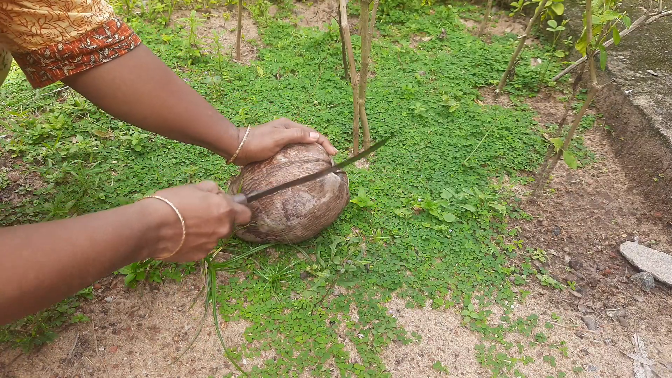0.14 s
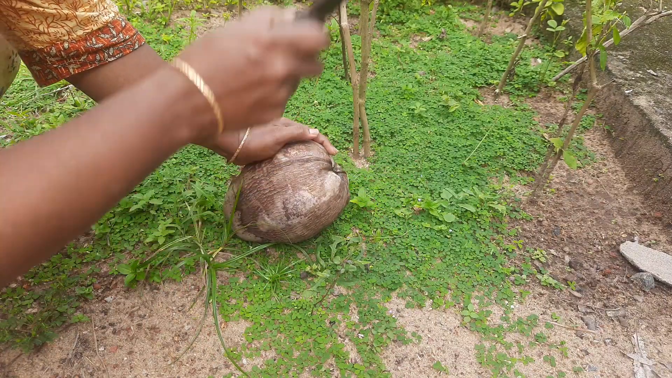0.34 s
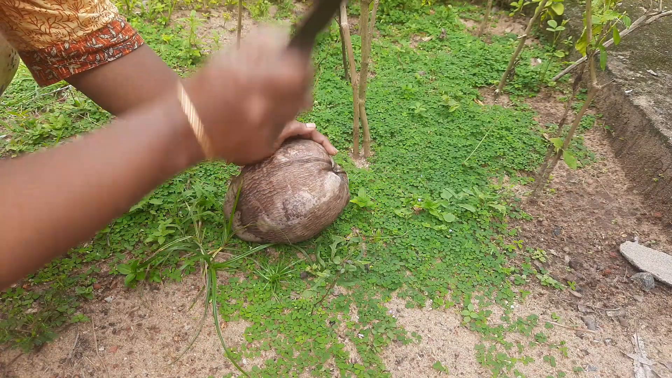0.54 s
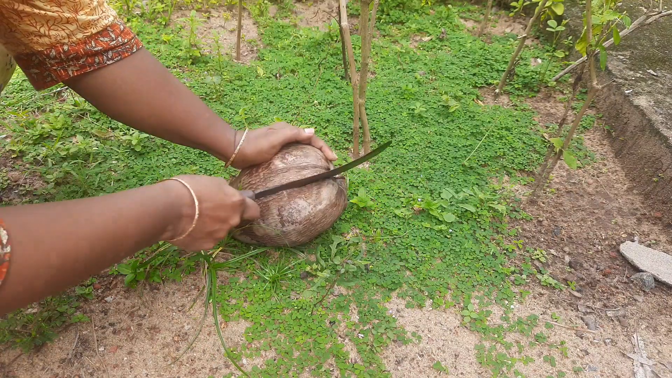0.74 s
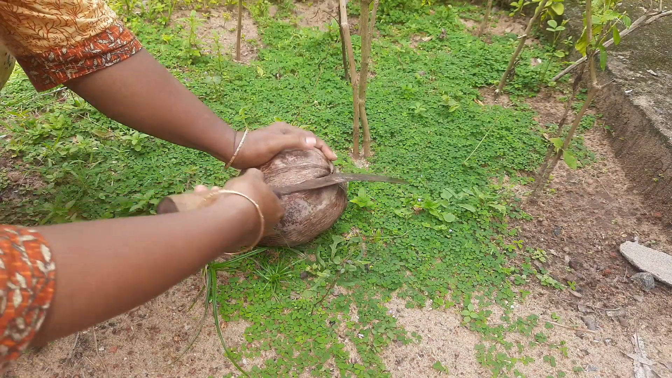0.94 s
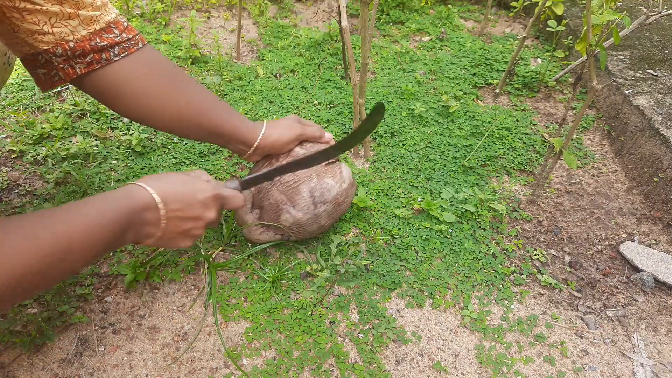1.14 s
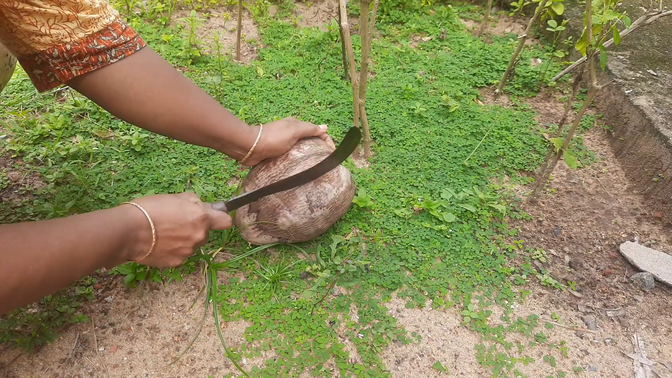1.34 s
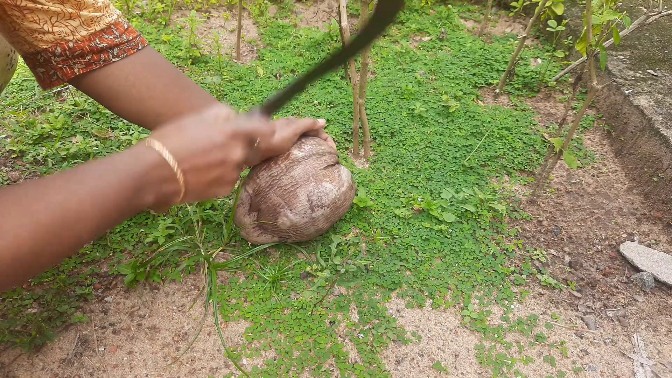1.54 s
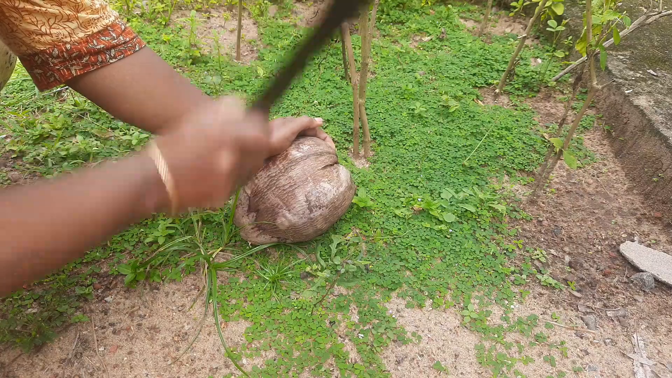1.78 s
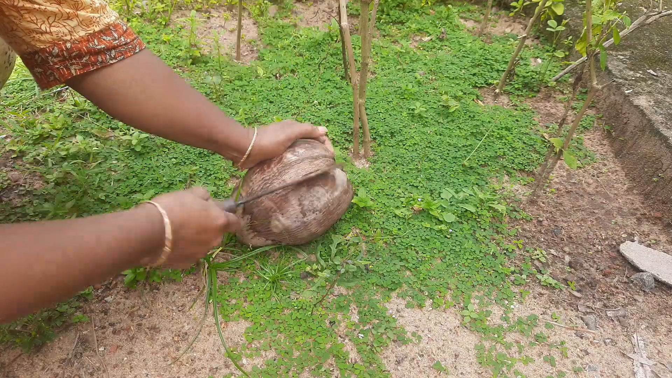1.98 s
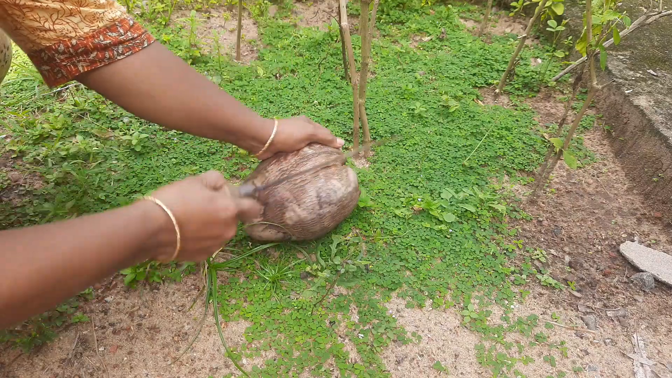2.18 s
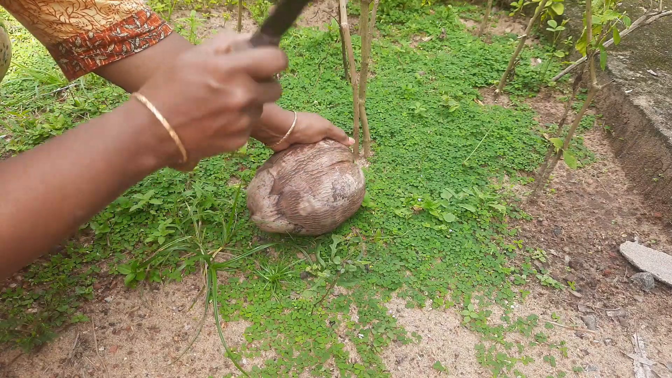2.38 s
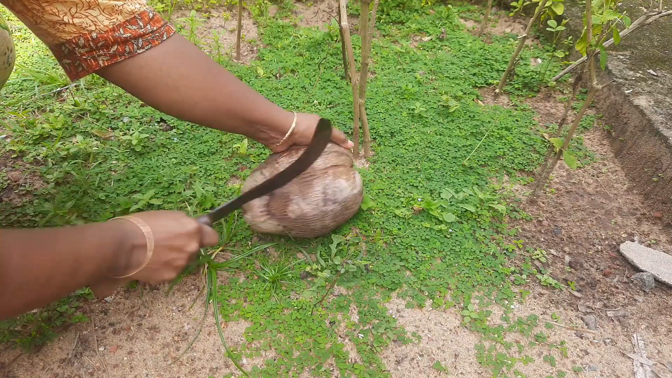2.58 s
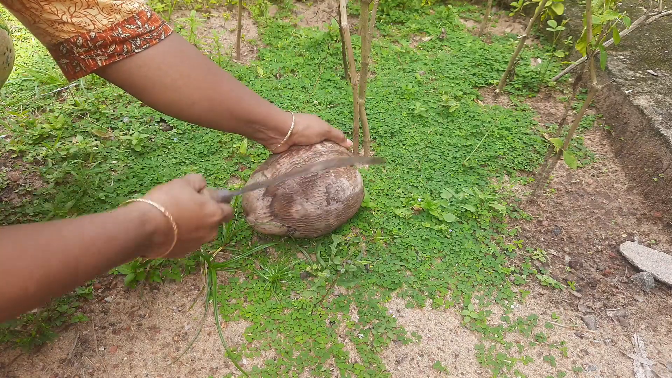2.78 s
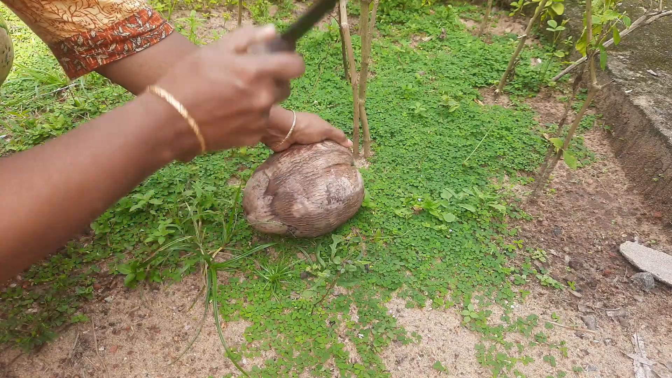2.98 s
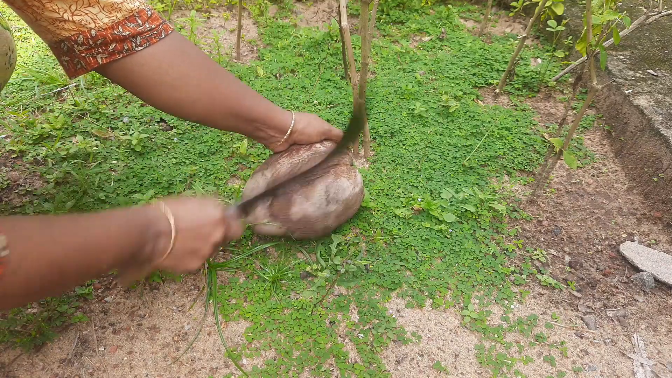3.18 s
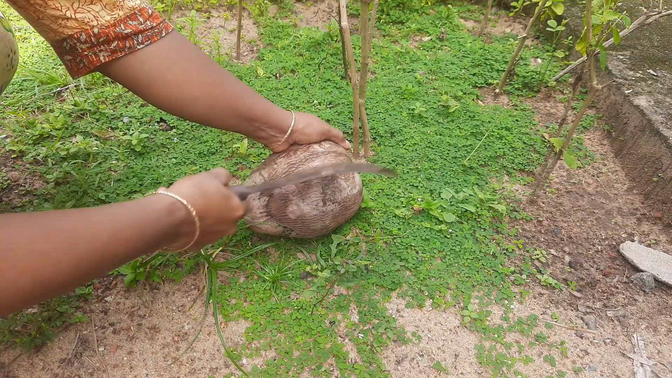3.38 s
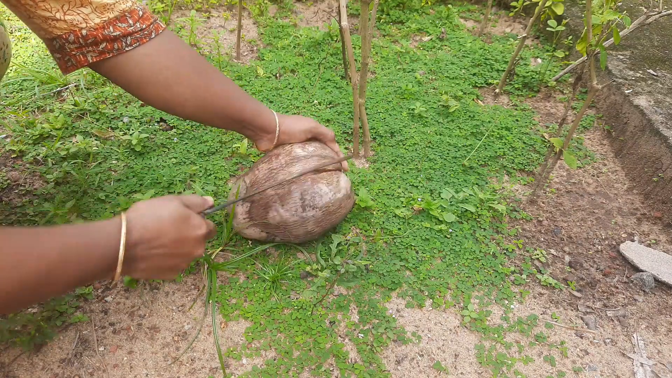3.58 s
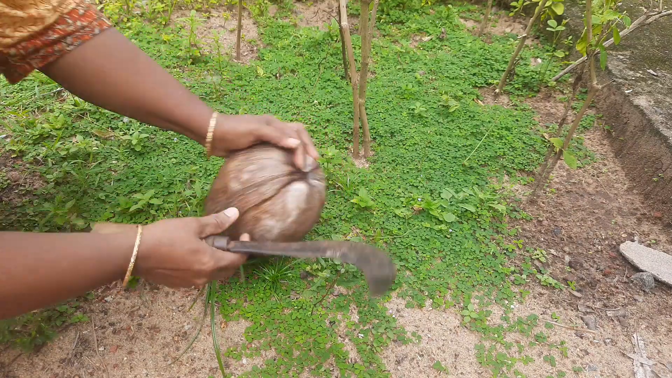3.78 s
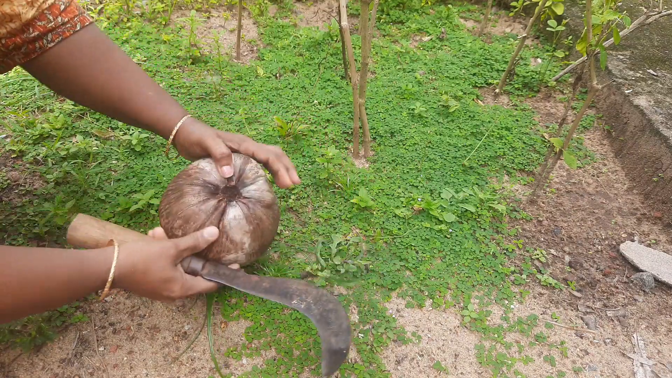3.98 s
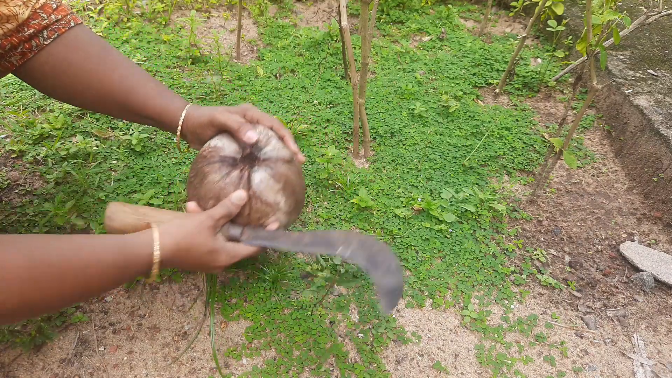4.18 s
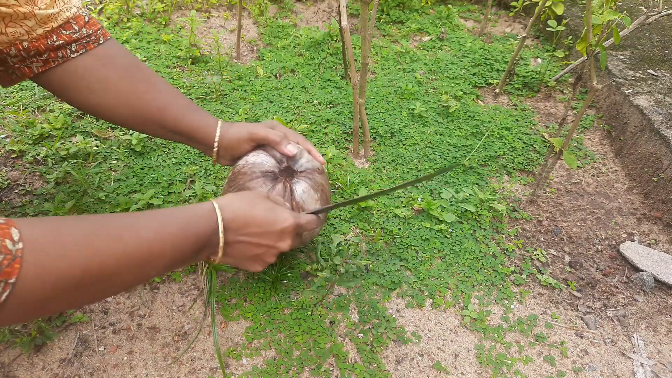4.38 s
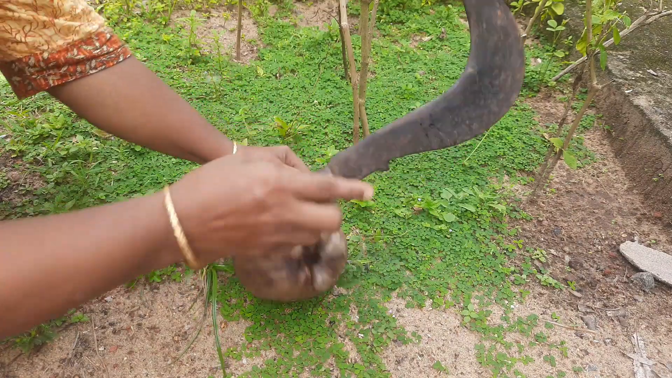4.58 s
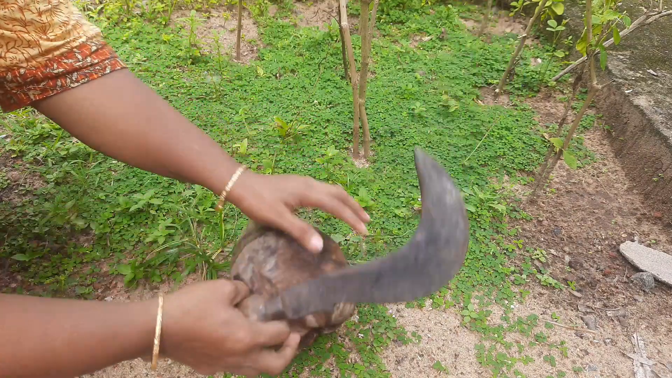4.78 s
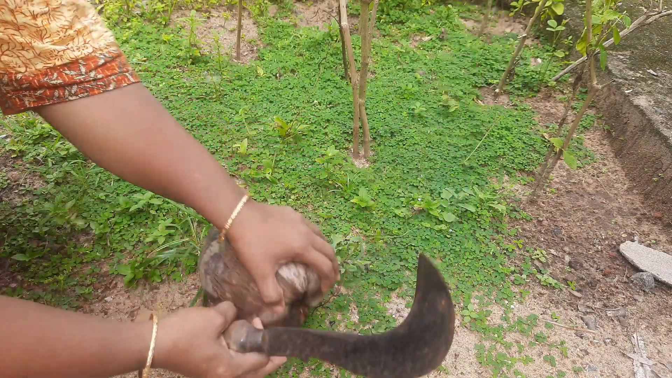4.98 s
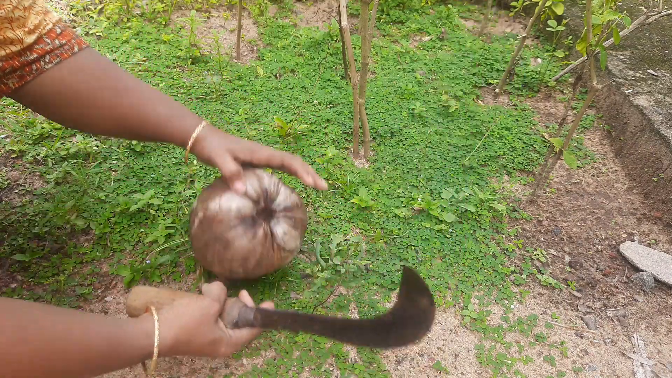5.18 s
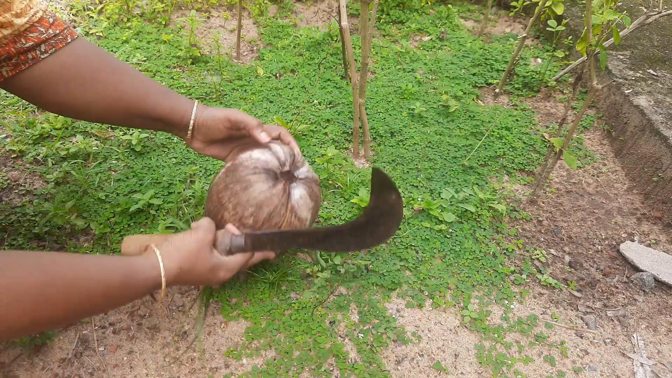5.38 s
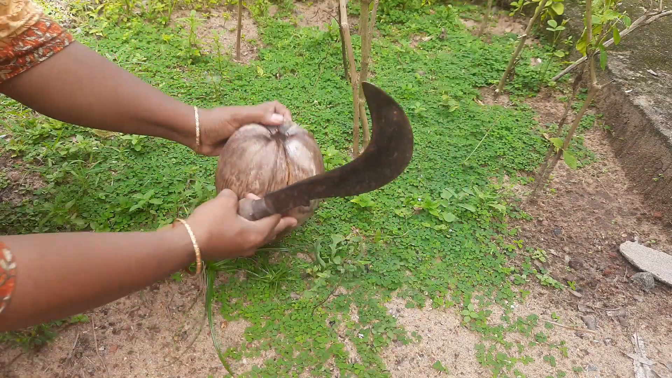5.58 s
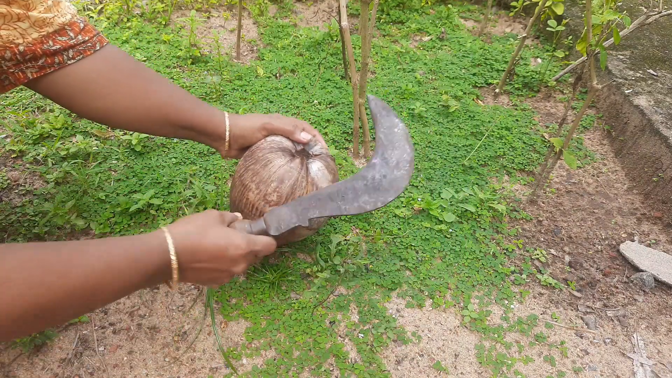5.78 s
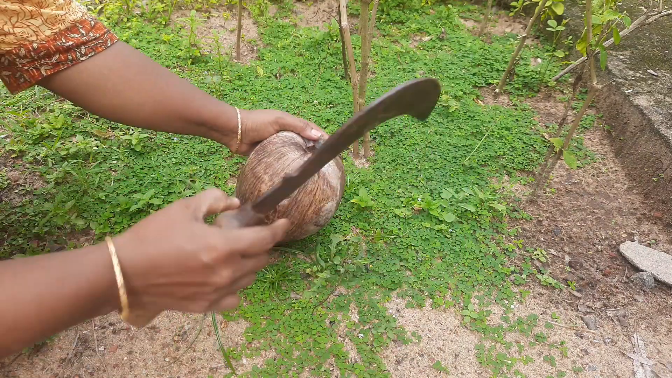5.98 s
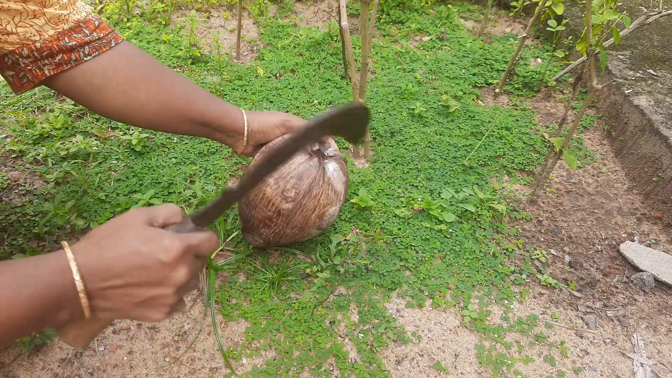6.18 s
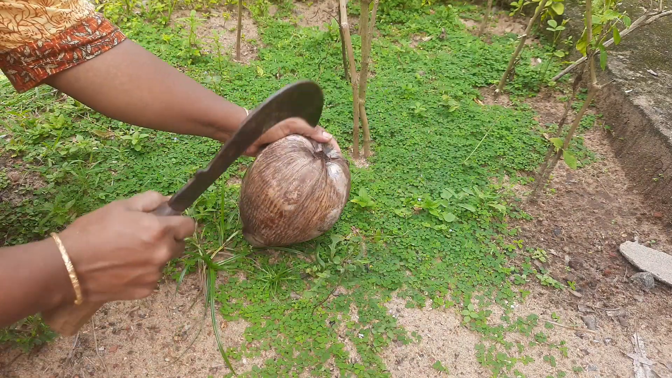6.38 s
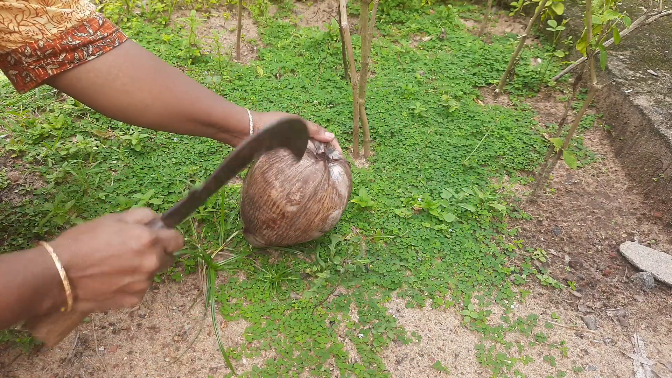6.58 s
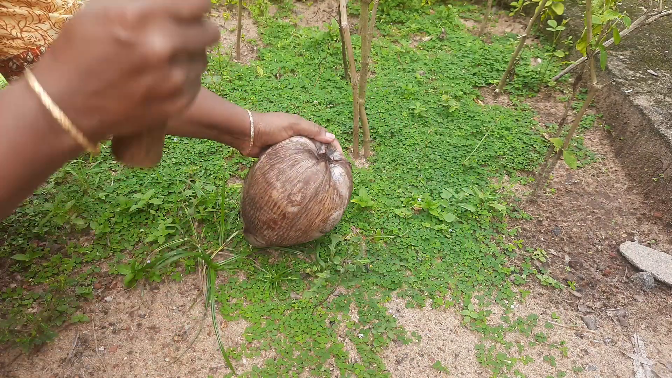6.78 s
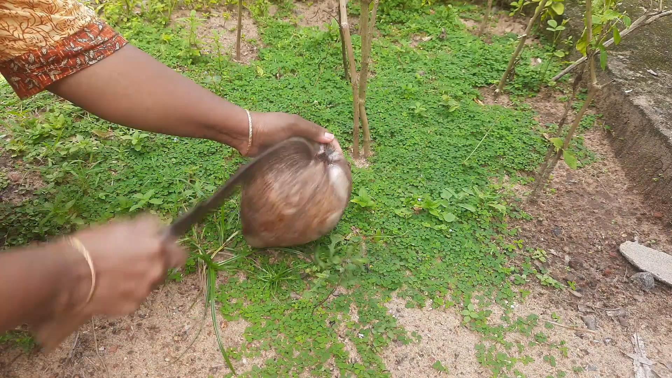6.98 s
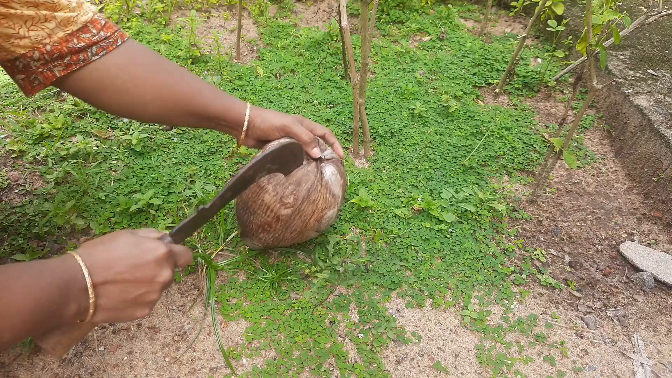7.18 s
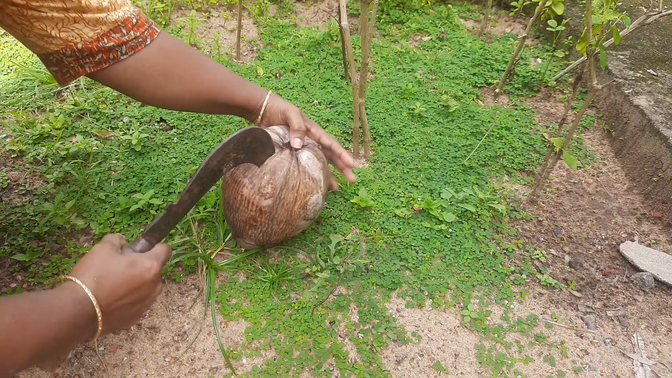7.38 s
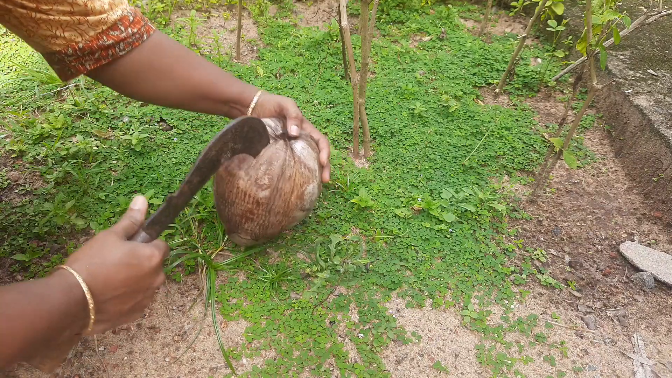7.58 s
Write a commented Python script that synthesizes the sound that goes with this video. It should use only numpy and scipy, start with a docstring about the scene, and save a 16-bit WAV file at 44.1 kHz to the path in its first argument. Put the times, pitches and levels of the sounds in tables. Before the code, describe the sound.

A heavy blade hacks a dry husk in sharp, woody blows, then hands rustle and turn it while crows caw and a bird whistles far off.

```python
"""Chopping a coconut

A heavy curved blade chops into a dry husk on grass, close to a two-port microphone: noise bursts ring husk
and shell, decaying tones make the thuds and chinks, and gritty noise makes the rustle of hands and fibres.
A wall and the yard throw the blows back as smeared copies and a sparse reverberant tail.
Far off a bird whistles in pairs (sine glides) and crows caw (pulsed noise) over a quiet wash of noise."""
import sys
import numpy as np
from scipy import signal
from scipy.fft import rfft, irfft
from scipy.io import wavfile
from scipy.ndimage import uniform_filter1d

SR = 44100
rng = np.random.default_rng(int(sys.argv[2]) if len(sys.argv) > 2 else 0)


def master_out(mix):
    """Clip the mix to full scale and print it as 16-bit PCM to the path in sys.argv[1]."""
    frames = np.transpose(np.atleast_2d(mix))
    ceiling = np.clip(frames, -1, 1)
    pcm = np.round(ceiling * 32767).astype(np.int16)
    wavfile.write(sys.argv[1], SR, pcm)


N = 336924

# Levels in the event tables are set against each other; the sources trim them further.
# Spectrum of leaves and traffic. Each row: frequency in Hz, density in relative dB per Hz.
WASH = [(15, -44.5), (25, -17.5), (90, -9), (187, -17), (410, -4.5), (952, -11), (5130, -29.5),
        (11000, -27.5), (14800, -30.5), (16500, -38)]
WASH_DB = -73.5  # rms
# Likeness of left and right in wash and yard. Each row: frequency in Hz, correlation (clipped to 1).
SAME = [(60, 1), (130, -1.6), (290, 0.98), (640, 0.2), (1410, -0.39), (3100, 0.11), (6820, 0.34),
        (15000, 1)]
# Far caws. Each row: start in seconds, length in seconds, throat resonance in Hz at the start,
# the same in Hz at the end, throat width in Hz, level in dB.
CAWS = [(0.1, 0.85, 1560, 1450, 506, -73), (1.161, 0.18, 1480, 1440, 307, -61.5),
        (2.845, 0.24, 1900, 1700, 300, -78), (3.643, 0.17, 1930, 2130, 710, -63.5),
        (4.1, 0.35, 1850, 1800, 607, -64.5), (4.472, 0.094, 1744, 1840, 350, -59),
        (5.324, 0.19, 2000, 1770, 305, -62.5), (5.519, 0.2, 1920, 1820, 298, -62.5),
        (6.488, 0.43, 1520, 1700, 300, -70.5), (6.555, 0.27, 1870, 1920, 300, -69),
        (6.766, 0.27, 1960, 1450, 438, -64.5), (7.252, 0.31, 1733, 1400, 300, -82)]
# Whistles in pairs. Each row: start in seconds, length in seconds, level in dB,
# start of the second note in seconds after the first, its length in seconds, its level in dB.
WHISTLES = [(0.337, 0.077, -59.5, 0.18, 0.14, -60), (2.244, 0.075, -61, 0.18, .15, -65),
            (6.418, 0.044, -63, 0.14, 0.11, -67)]
FIRST_HZ, SECOND_HZ = (2160, 2760), (2270, 3020)  # each note glides up from, to
# How long the yard rings, before stretching. Each row: frequency in Hz, 60 dB decay time in seconds.
YARD = [(100, 0.69), (300, 0.74), (700, 0.49), (2000, 0.47), (5000, 0.26), (10000, 0.4), (16000, 0.46)]
# Copies off the walls. Each row: delay in seconds, 60 dB decay time of the smear in seconds, level in dB.
ECHOES = [(0.025, 0.026, -23.5), (0.033, 0.011, -16.5), (0.036, 0.12, -13.5), (.143, .006, -55)]
# What the walls favour. Each row: resonance in Hz, width in Hz, relative level in dB.
WALL = [(200, 200, -10), (610, 530, 5.5), (2000, 1500, -7), (5000, 2800, -20)]
# Hands working over husk and grass, as an envelope. Each row: time in seconds, fine rustle level in dB.
HANDS = [(0, -83.5), (1.7, -92), (2.3, -75.5), (2.551, -94.5), (3.548, -86), (3.701, -70.5), (3.8, -63),
         (3.85, -66.5), (4.0, -67.5), (4.171, -67), (4.26, -72.5), (4.32, -65), (4.44, -67), (4.54, -56.5),
         (4.59, -62.5), (4.68, -65), (4.751, -76.5), (4.92, -73), (4.97, -65), (5.05, -67.5), (5.15, -61),
         (5.34, -68.5), (5.45, -76.5), (5.65, -72.5), (5.8, -73.5), (6.061, -81.5), (6.3, -86.5),
         (6.602, -82), (7.0, -82), (7.19, -63), (7.36, -75), (7.64, -77)]
# The stuck blade is wrenched in its cut. Each row: start in seconds, length in seconds,
# fine rustle in dB, coarse scrape in dB, low shuffle in dB.
WRENCHES = [(0.728, 0.25, -69, -84, -64), (0.971, 0.29, -69.5, -62.5, -71), (1.895, 0.22, -61.5, -59, -51)]
# Colours of the three grain sizes of rustle. Each row: frequency in Hz, density in relative dB per Hz.
FINE = [(2650, -34), (4500, 1), (8010, 3), (9900, -3), (12200, 0.5), (15000, -3), (16200, -1), (16500, -50)]
COARSE = [(250, -37), (500, -10), (1000, 1.5), (2000, 4), (3500, -3), (5500, 1), (8000, -23)]
SHUFFLE = [(20, -43), (40, -2.5), (70, 5.5), (120, -1), (250, -11), (450, -16.5), (700, -50)]
HANDS_COARSE_DB, CRUSH_COARSE_DB = -2.5, 10  # coarse scrape against fine rustle
STILL_COARSE_DB, STILL_SHUFFLE_DB = -86.5, -70  # steady floors of scrape and shuffle
TICKS_PER_S, TICKS_DB = 70, -11  # single ticks in the rustle; level against fine rustle
AFTER_S = 0.052  # crushed husk and rocking nut swell to their top this long after a hit
# Blade on husk. Each row: start in seconds, crack in dB, knock in dB, sizzle in dB, deep thud in dB,
# hollow thud in dB, hollow pitch as a factor, crushed husk in dB, rocking in dB.
BLOWS = [(0.082, -44, -36.5, -57, -46.5, -44.5, 1.19, -90, -63.5),
         (0.6448, -14.5, -21.5, -22.5, -29, -27, 1.15, -65, -50),
         (1.348, -40.5, -34, -52.5, -44, -36, 1.02, -86.5, -61.5),
         (1.8512, -16, -24, -22, -30.5, -20, 0.84, -74.5, -51),
         (2.5929, -13, -20, -26, -33, -23, 1.16, -59.5, -43),
         (3.2194, -12.5, -18.5, -29.5, -28.5, -18, 1.15, -73.5, -48),
         (6.5348, -31, -30.5, -39.5, -57, -36, 1.12, -87, -69.5),
         (7.0256, -21.5, -27, -20, -43, -26.5, 0.92, -86, -56)]
BLOW_T60_S, CRACK_T60_S = 0.026, 0.021  # 60 dB decay of the noise burst
THUD_LATE_S = 0.0042  # the nut meets the soil just after the edge bites
# The nut set down, rolled or driven onto the ground. Each row: start in seconds, hollow thud in dB,
# deep thud in dB, hollow pitch as a factor, rocking in dB.
BUMPS = [(3.512, -43.5, -52, 0.87, -51), (4.337, -41, -41, 0.91, -58.5), (5.658, -42.5, -51.5, 1.01, -69),
         (7.0335, -18, -47, 0.834, -70)]
# Short cracks: snapping fibres, the crack of a bump, and the last blow's second bite.
# Each row: start in seconds, crack in dB, knock in dB, sizzle in dB.
CRACKS = [(0.7253, -59, -60, -42), (0.8046, -47, -55, -48.5), (0.839, -27, -36.5, -26.5),
          (0.8715, -34.5, -78, -37.5), (0.9, -39, -48.5, -35), (0.973, -64, -70, -64),
          (1.0952, -41, -52.5, -50.5), (1.8632, -35, -36.5, -33), (2.0124, -61, -75, -50),
          (2.0273, -45.5, -52, -50), (2.0587, -41, -50.5, -41), (2.0668, -46, -61, -58),
          (3.5928, -29, -42.5, -37), (3.924, -48.5, -56, -45), (3.9387, -51.5, -58, -56),
          (4.043, -61, -70, -56), (4.0776, -56, -72.5, -53), (4.237, -65, -82, -64),
          (4.334, -42, -54, -47.5), (4.418, -55, -66, -62), (4.6383, -60, -70, -57),
          (4.6929, -51, -76, -70), (4.9524, -53.5, -69, -50.5), (5.3609, -57.5, -66, -58),
          (5.659, -49.5, -66, -46.5), (7.0328, -23.5, -25, -34)]
# The blade chinks as it comes free. Each row: start in seconds, level in dB, pitch as a factor,
# ring time as a factor (a looser grip rings longer), lift of the fourth mode in dB.
TINKS = [(.133, -57.5, 0.96, 1.8, -6), (2.056, -40, .92, 2.1, 15), (3.548, -28.5, 1.04, 0.67, 10),
         (3.572, -33, 0.93, 0.83, -4), (3.594, -51, 1.005, 1, 0), (3.907, -45, 1.5, 1, -10),
         (6.54, -61.5, 1, 1.7, 20)]
# Short drags of blade or husk, one faint narrow hiss and one faint ring of the blade.
# Each row: start in seconds, length in seconds, centre in Hz, width in Hz, level in dB.
SCUFFS = [(1.047, 0.068, 1120, 1510, -54), (1.067, 0.047, 5860, 9000, -52), (1.987, 0.1, 1650, 2520, -60),
          (3.501, 0.04, 671, 975, -43.5), (3.502, 0.095, 5800, 9260, -52), (3.869, 0.074, 5000, 9100, -54),
          (4.352, 0.047, 910, 400, -51.5), (4.372, 0.057, 5000, 8000, -52.5), (4.758, 0.26, 6720, 700, -79),
          (4.944, 0.073, 2000, 1810, -59), (4.608, 0.029, 9000, 14200, -50),
          (4.611, 0.023, 2570, 2960, -52.5), (5.212, .02, 11000, 10100, -55),
          (5.214, 0.014, 6080, 900, -47), (5.646, 0.11, 4760, 247.5, -71), (5.364, 0.033, 756, 503, -65.5),
          (5.463, 0.09, 1100, 610, -66.5)]
# Broad resonances of husk, of splitting fibre ends, and of the shell under the husk.
# Each row: resonance in Hz, width in Hz, relative level in dB.
HUSK = [(1640, 1100, -8), (2600, 1200, -4.5), (3090, 2500, -9), (6020, 1700, -8.5)]
SIZZLE = [(8000, 2100, 1.5), (11000, 3700, -1), (12440, 3000, 2.5), (16500, 370, -2)]
KNOCK = [(602, 1400, -0.5), (1100, 920, 8)]
# Ringing modes of soil and rocking nut, of the hollow nut, and of the blade, before detuning.
# Each row: frequency in Hz, relative level in dB, 60 dB decay time in seconds.
DEEP = [(60, -11, 0.11), (107, -11, 0.26), (139, -6.5, 0.1)]
HOLLOW = [(215, -2.5, 0.095), (287, -3, 0.062), (349, 3.5, 0.033)]
BLADE = [(3430, 10, 0.036), (3740, 2.5, 0.048), (4580, -5, 0.063), (6100, -6, 0.051), (7440, -12, 0.039),
         (9920, -36, 0.053), (11500, 6, 0.017)]
# How far the right port lags for rustling hands, then for blows. Each row: frequency in Hz, lag in radians.
LAG = [(300, 0), (800, .2), (1400, .6), (2300, 1.2), (3500, 2), (5000, 2.9), (7000, 4.4), (9500, 6.2),
       (16000, 6.3)]
BLOW_LAG = [(300, 0), (800, .2), (1400, .7), (2300, 1.2), (3500, 1.5), (5000, 2.1), (5800, 2.5),
            (6500, 3.9), (7500, 4.4), (9500, 4.9), (16000, 5.1)]
# Balance of the ports. Each row: frequency in Hz, left minus right in dB.
TILT = [(60, -2), (150, -2), (300, -.3), (1000, -1.5), (2500, -.6), (5000, 1.5), (13000, 2.4)]
EDGE_HZ = 16600  # upper band limit


def gain_of(db):
    """Decibels to gain."""
    return 10 ** (np.asarray(db) / 20)


def evened(x):
    """Scales to rms 1."""
    return x / np.sqrt(np.mean(x ** 2) + 1e-20)


def read(points, hz):
    """Reads a curve on a log-frequency axis."""
    f, value = np.transpose(points)
    return np.interp(np.log(hz + 1), np.log(f + 1), value)


def add(mix, s, sound):
    """Mixes a sound in at time s, cut off at the end of the mix."""
    part = mix[..., round(s * SR):][..., :sound.shape[-1]]
    part += sound[..., :part.shape[-1]]


def resonate(x, hz, width):
    """A resonance of about unit gain at its peak, which follows the curve hz."""
    turn = np.exp(2j * np.pi * np.cumsum(hz * np.ones(len(x))) / SR)
    r = np.exp(-np.pi * width / SR)
    lowered = x / turn + 1e-18  # the resonance shifted down to 0 Hz
    return 2 * (turn * signal.lfilter([1 - r], [1, -r], lowered)).real


def body(x, modes):
    """Passes x twice through each broad resonance of a body, with alternating signs."""
    out = 0
    for k, (hz, width, db) in enumerate(modes):
        twice = resonate(resonate(x, hz, width), hz, width)
        out = out + (-1) ** k * gain_of(db) * twice
    return out


def coloured(x, points):
    """Filters x by a spectrum curve, then scales to rms 1."""
    hz = np.fft.rfftfreq(x.shape[-1], 1 / SR)
    return evened(irfft(rfft(x) * gain_of(read(points, hz)), x.shape[-1]))


def grit(count, spread_db):
    """Noise whose samples differ much in size: many tiny breaks."""
    sizes = gain_of(spread_db * np.minimum(rng.exponential(1, count), 6))
    return evened(rng.standard_normal(count) * sizes)


def paired(left, other, hz):
    """Blends two independent spectra so that left and right are as alike as SAME asks."""
    same = np.clip(read(SAME, hz), -1, 1)[:, None]
    return np.array([left, same * left + np.sqrt(1 - same ** 2) * other])


def wash():
    """Distant leaves and traffic: smooth noise with drifting patches in time and frequency."""
    frames, hz = N // 256 + 5, np.fft.rfftfreq(1024, 1 / SR)
    a, b, c, d, patches = rng.standard_normal((frames, 513, 5)).T
    patches = evened(uniform_filter1d(uniform_filter1d(patches, 12, 0), 20, 1))
    z = paired(a + 1j * b, c + 1j * d, hz)
    z *= gain_of(read(WASH, hz)[:, None] + 1.4 * patches)
    noise = signal.istft(z, nperseg=1024, noverlap=768)[1][:, :N]
    return gain_of(WASH_DB) * evened(noise)


def crows():
    """Rough puffs of noise, one a cycle at an unsteady pitch around 240 Hz, through a narrow throat."""
    out = np.zeros(N)
    for s, length, start_hz, end_hz, width, db in CAWS:
        u = np.arange(0, length, 1 / SR) / length
        wobble = uniform_filter1d(rng.standard_normal(len(u)), 400)
        turns = np.cumsum(240 * (1 + 2.4 * wobble)) / SR
        puffs = np.exp(-(turns % 1) / 0.25) * (0.6 + rng.standard_normal(len(u)))
        throat_hz = start_hz + (end_hz - start_hz) * u
        caw = evened(resonate(resonate(puffs, throat_hz, width), throat_hz, width))
        add(out, s, gain_of(db) * caw * signal.windows.tukey(len(u), 0.4))
    return out


def whistle(length, db, low_hz, top_hz):
    """A near-sine glide that levels off at the top."""
    u = np.arange(0, length, 1 / SR) / length
    hz = low_hz + (top_hz - low_hz) * np.sin(np.pi / 2 * u) ** 2.2
    return gain_of(db) * np.sin(np.pi * u ** 1.1) * np.sin(2 * np.pi * np.cumsum(hz) / SR)


def bird():
    """A small bird whistles two rising notes at a time, the second one higher."""
    out = np.zeros(N)
    for s, length, db, gap, length_two, db_two in WHISTLES:
        add(out, s, whistle(length, db, *FIRST_HZ))
        add(out, s + gap, whistle(length_two, db_two, *SECOND_HZ))
    return out


def yard(x, wet_db, start, stretch):
    """Sparse taps of random sign dying band by band, swelling in over about start seconds."""
    taps = rng.choice([-1., 1.], (2, SR)) * (rng.random((2, SR)) < 0.1)
    hz, t, z = signal.stft(taps, SR, nperseg=256)
    z = paired(z[0], z[1], hz)
    decay = gain_of(-60 * t / stretch / read(YARD, hz)[:, None])
    tail = signal.istft(z * decay, SR, nperseg=256)[1][:, :SR]
    tail = tail * (1 - np.exp(-(np.arange(SR) / SR / start) ** 2))
    tail = tail / np.linalg.norm(tail[0])
    return gain_of(wet_db) * signal.fftconvolve(x[None], tail, axes=1)[:, :N]


def walls(x):
    """Rough walls send back smeared, hollow copies: decaying noise after each delay."""
    back, t = np.zeros((2, 9000)), np.arange(3000) / SR
    for delay, t60, db in ECHOES:
        noise = rng.standard_normal((2, 3000)) + rng.standard_normal(3000)  # half shared by both sides
        smear = noise * gain_of(-60 * t / t60)
        add(back, delay, gain_of(db) * smear / np.linalg.norm(smear[0]))
    return signal.fftconvolve(body(x, WALL)[None], back, axes=1)[:, :N]


def swell(rows):
    """Sum of swells that follow hits at (s, top dB): a quick rise, a slower fall."""
    out, u = np.zeros(N), np.arange(SR // 2) / SR / AFTER_S
    for s, db in rows:
        add(out, s, gain_of(db) * u * np.exp(1 - u))
    return out


def rustle():
    """Gritty noise in three sizes for hands, crushed husk, rocking nut and wrenched blade, in short clumps."""
    hands = gain_of(np.interp(np.arange(N) / SR, *np.transpose(HANDS)))
    crush = swell([(s, crush_db) for s, *_, crush_db, _ in BLOWS])
    rock = swell([(s, rock_db) for s, *_, rock_db in BLOWS + BUMPS])
    coarse = gain_of(STILL_COARSE_DB) + hands * gain_of(HANDS_COARSE_DB) + crush * gain_of(CRUSH_COARSE_DB)
    levels = np.array([hands + crush, coarse, gain_of(STILL_SHUFFLE_DB) + rock])
    for s, length, *dbs in WRENCHES:
        hump = np.sin(np.pi * np.arange(0, length, 1 / SR) / length) ** 2
        add(levels, s, gain_of(dbs)[:, None] * hump)

    quick = evened(uniform_filter1d(rng.standard_normal(N), 250))
    slow = evened(uniform_filter1d(rng.standard_normal(N), 1500))
    clumps = evened(quick + slow)

    ticks = rng.standard_normal(N) * (rng.random(N) < TICKS_PER_S / SR)
    out = gain_of(TICKS_DB) * levels[0] * evened(body(ticks, HUSK + SIZZLE)) * np.ones((2, 1))
    for level, colour, clump_db in zip(levels, (FINE, COARSE, SHUFFLE), (2.4, 2.6, 2.1)):
        centre, apart = grit(N, spread_db=2.5), rng.standard_normal((2, N))
        out += level * gain_of(clump_db * clumps) * coloured(centre + 0.74 * apart, colour)
    return out


def scuff(length, hz, width, db):
    """Gritty noise through one resonance, swelling and fading: a drag if wide, a hiss or ring if narrow."""
    u = np.arange(0, length, 1 / SR) / length
    drag = resonate(resonate(grit(len(u), spread_db=-1.0), hz, width), hz, width)
    return gain_of(db) * evened(drag) * np.sin(np.pi * u ** 1.2)


def ring(db, modes, rise, detune, pitch=1):
    """A push rings decaying sine modes, tuned a little differently every time."""
    t = np.arange(12000) / SR
    tune = pitch * (1 + detune * (2 * rng.random(len(modes)) - 1))
    tone = np.zeros(len(t))
    for (hz, mode_db, t60), k in zip(modes, tune):
        tone += gain_of(mode_db - 60 * t / t60) * np.sin(2 * np.pi * hz * k * t)
    tone = tone * (1 - np.exp(-t / rise))
    return gain_of(db) * tone / abs(tone).max()


def chink(db, pitch, loose, lift_db):
    """The freed blade rings its metal modes; a looser grip damps them less."""
    modes = []
    for k, (hz, mode_db, t60) in enumerate(BLADE):
        modes.append((hz, mode_db + lift_db * (k == 3), t60 * loose))
    return ring(db, modes, rise=0.000575, detune=0.0091, pitch=pitch)


def thud(deep_db, hollow_db, pitch):
    """The nut is driven into the soil; how it lies sets the pitch of its hollow."""
    deep = ring(deep_db + 6.5, DEEP, rise=0.0004, detune=0.17)
    hollow = ring(hollow_db + 3, HOLLOW, rise=0.00043, detune=0.051, pitch=pitch)
    return deep - hollow


def settling(sizzle_db):
    """Cut fibres go on crackling for a moment after a blow: sparse ticks that die away."""
    t = np.arange(12000) / SR
    ticks = grit(len(t), spread_db=2.5) * (rng.random(len(t)) < 0.1)
    crackle = evened(body(ticks, HUSK[3:] + SIZZLE))
    return gain_of(sizzle_db - 31.0 - 60 * t / 0.45) * crackle


def crack(crack_db, knock_db, sizzle_db, t60):
    """A sharp blow and a burst of breaking fibres ring shell and husk; row two, for the yard, is one click."""
    t = np.arange(3000) / SR
    burst = grit(len(t), spread_db=1.5) * gain_of(-60 * t / t60) * (1 - np.exp(-(t / 0.00032) ** 2))
    blow = np.exp(-((t - 0.0006) / 0.00003) ** 2)  # the edge bites, then stops dead
    burst = burst - 3.6 * blow
    impulse = 1. * (t == 0)
    out = np.zeros((2, len(t)))
    for db, modes in ((knock_db, KNOCK), (crack_db, HUSK), (sizzle_db, SIZZLE)):
        ringing, click = body(burst, modes), body(impulse, modes)
        click = click * np.linalg.norm(ringing) / np.linalg.norm(click)  # same energy
        out += gain_of(db + 9) * np.array([ringing, click]) / abs(ringing).max()
    return out


def chopping():
    """All blows, bumps, short cracks, chinks and scuffs: toward the microphone, toward the yard."""
    out = np.zeros((2, N))
    for s, crack_db, knock_db, sizzle_db, deep_db, hollow_db, pitch, _, _ in BLOWS:
        add(out, s, crack(crack_db, knock_db, sizzle_db, BLOW_T60_S))
        add(out, s + THUD_LATE_S, thud(deep_db, hollow_db, pitch))
        add(out, s + 0.0043, settling(sizzle_db))
    for s, hollow_db, deep_db, pitch, _ in BUMPS:
        add(out, s, thud(deep_db, hollow_db, pitch))
    for s, crack_db, knock_db, sizzle_db in CRACKS:
        add(out, s, crack(crack_db, knock_db, sizzle_db, CRACK_T60_S))
    for s, *row in TINKS:
        add(out, s, chink(*row))
    for s, *row in SCUFFS:
        add(out, s, scuff(*row))
    return out


def ports(blows, hands):
    """Near sounds reach the left port first; the right lags, and the balance shifts with frequency."""
    hz = np.fft.rfftfreq(N, 1 / SR)
    tilt = gain_of(read(TILT, hz) / 2)
    left = rfft(blows + hands[0]) * tilt
    late_blows = rfft(blows) * np.exp(-1j * read(BLOW_LAG, hz))
    late_hands = rfft(hands[1]) * np.exp(-1j * read(LAG, hz))
    return irfft(np.array([left, (late_blows + late_hands) / tilt]), N)


def scene():
    """Near work with its echoes, far birds mostly as reverberation, over the wash."""
    (direct, away), whistles, caws = chopping(), bird(), crows()
    near = ports(direct, rustle())
    near = near + yard(away, wet_db=-16.5, start=0.0081, stretch=0.97) + walls(away)
    far_crows = caws * gain_of(-4.5) + yard(caws, wet_db=-2.0, start=0.014, stretch=1.0)
    far_bird = whistles * gain_of([[-4], [-6]])  # left, right
    far_bird = far_bird + yard(whistles, wet_db=2.5, start=0.012, stretch=1.6)
    return near + far_bird + far_crows + wash()


def record(dry):
    """The microphone drops the deepest bass; then the band limit."""
    thin = signal.lfilter(*signal.butter(3, 55, "high", fs=SR), dry)
    lowpass = signal.firwin(255, EDGE_HZ, window=("kaiser", 9), fs=SR)
    return signal.oaconvolve(thin, lowpass[None], "same")


dry = scene()
out = record(dry)
master_out(out)
```